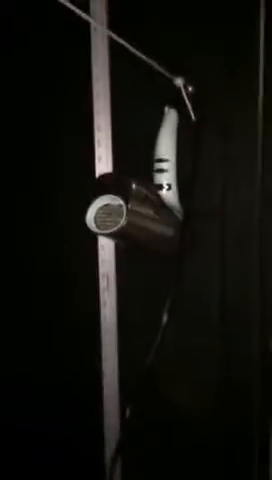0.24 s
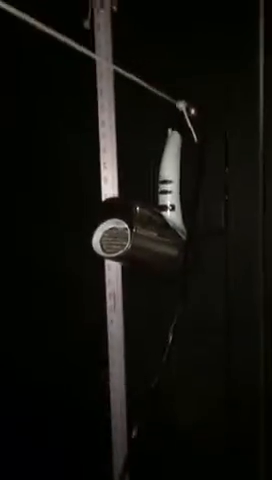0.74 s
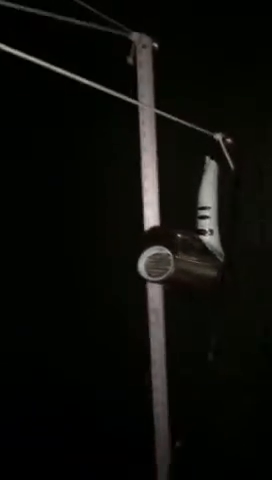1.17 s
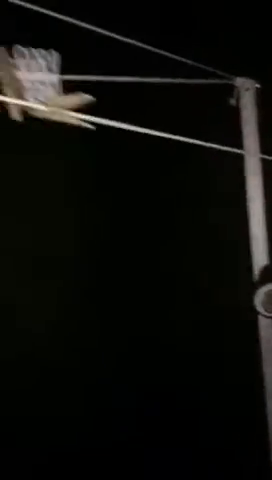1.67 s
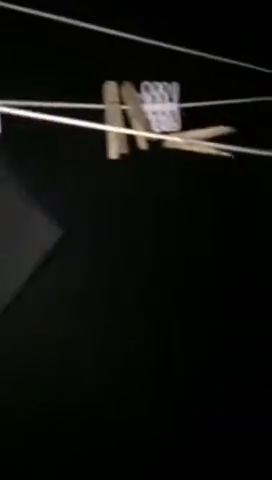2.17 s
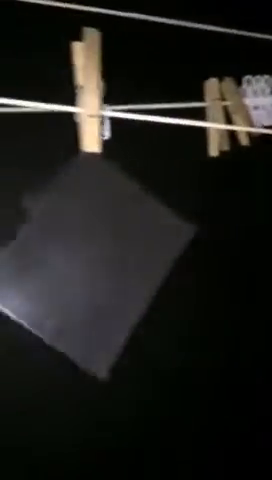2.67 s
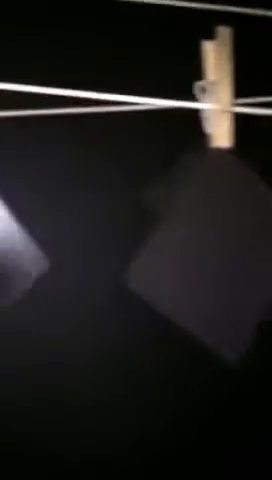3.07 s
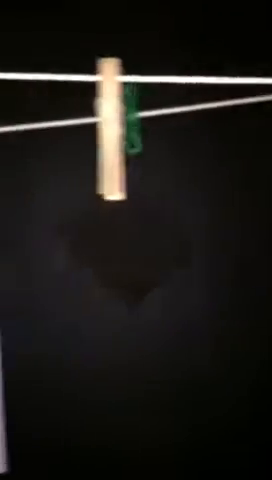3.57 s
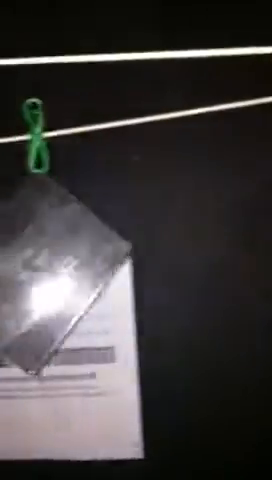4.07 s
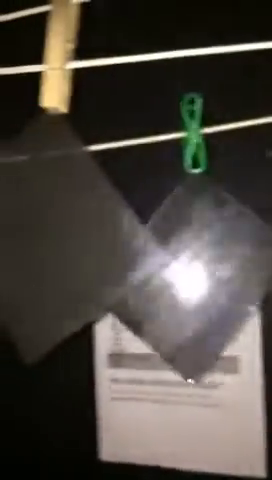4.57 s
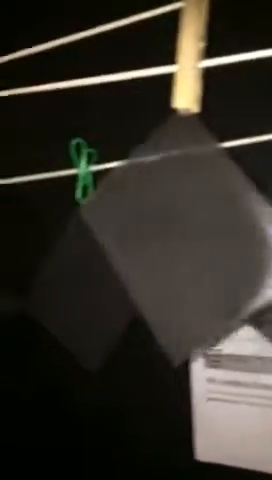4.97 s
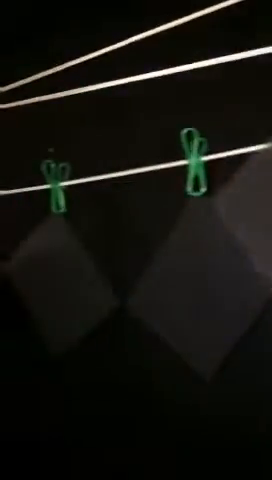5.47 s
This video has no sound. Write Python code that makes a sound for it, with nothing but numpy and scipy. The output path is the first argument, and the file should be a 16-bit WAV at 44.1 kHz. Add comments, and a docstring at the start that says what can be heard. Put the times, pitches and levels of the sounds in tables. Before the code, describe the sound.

A hair dryer hanging from a line blows without pause in a small room. Its broad, breathy rush carries a hollow howl that throbs unevenly several times a second, with a thin steady fan whine above it. A handheld microphone drifts slowly away, so the tone colour slides subtly while the loudness stays nearly level. The dryer neither starts nor stops.

```python
"""A rush of air with a throbbing howl and a thin whine: a hair dryer hangs from a line and runs steadily in a
small room, while the microphone moves slowly away. The rush is shaped noise; the howl is noise ringing barrel,
grille and room; a seven-blade fan adds sine tones locked to its shaft. Narrow bands of noise make faint drones
and ridges that stand out of the rush for a moment, most sliding slowly in pitch. Sliding echoes and moving
bands shift the colour of the rush as the microphone moves."""
import sys
import numpy as np
from scipy import signal
from scipy.fft import rfft, irfft
from scipy.io import wavfile
from scipy.ndimage import uniform_filter1d, map_coordinates

SR = 44100
rng = np.random.default_rng(int(sys.argv[2]) if len(sys.argv) > 2 else 0)


def unload_audio(sound):
    """Save the sound as a 16-bit wav file, at the path given as the first command line argument."""
    columns = np.transpose(np.atleast_2d(sound))
    # keep every value between -1 and 1, then stretch to whole-number steps
    steps = np.round(np.clip(columns, -1, 1) * 32767)
    wavfile.write(sys.argv[1], SR, steps.astype(np.int16))


N = 253125
TIME = np.arange(N) / SR
HZ = np.fft.rfftfreq(N, 1 / SR)


def gain_of(db):
    """Level definition: converts decibels to an amplitude ratio."""
    return 10 ** (np.asarray(db) / 20)


def evened(x):
    """Root-mean-square normalisation: scales to rms 1."""
    return x / np.sqrt(np.mean(x ** 2) + 1e-20)


def read(points, hz):
    """Spectral interpolation: reads a level curve along a logarithmic frequency axis."""
    f, value = np.transpose(points)
    return np.interp(np.log(hz + 1), np.log(f + 1), value)


def follow(rows, t):
    """Linear interpolation: reads every column of a curve table at the times t."""
    s, *columns = np.transpose(rows)
    return [np.interp(t, s, column) for column in columns]


def swell(centre_s, spread_s):
    """Gaussian envelope: a smooth rise and fall of height 1, with its standard deviation in seconds."""
    return np.exp(-.5 * ((TIME - centre_s) / spread_s) ** 2)


def bell(centre_hz, width_hz):
    """Lorentzian resonance curve: height 1, and half of that at the edges of its width."""
    return 1 / (1 + (2 * (HZ - centre_hz) / width_hz) ** 2)


def noise(gain):
    """Spectral shaping: random noise of rms 1 with the given amplitude spectrum."""
    return evened(irfft(gain * rfft(rng.standard_normal(N)), N))


def wander(rate_hz):
    """Low-pass random process: slow chance of rms 1, up to about the given rate."""
    return noise((HZ > 0) / (1 + (HZ / rate_hz) ** 4))


def steadied(x, span_s=0.13):
    """Power levelling: evens out a resonance's slow swells and keeps its quick throbs."""
    power = uniform_filter1d(x ** 2, int(span_s * SR), mode="wrap")
    return x / np.sqrt(power + 1e-9)


def ringing(hz, width_hz):
    """Resonance under random excitation: noise sounds through one steep resonance."""
    return steadied(noise(bell(hz, width_hz)))


def delayed(x, delay_s):
    """Propagation delay: reads a steady sound through a changing travel time."""
    return map_coordinates(x, [(TIME - delay_s) * SR], order=3, mode="wrap")


def rush(flutter_db=0.53, flicker_db=1.5, hiss_flutter_db=0.47):
    """Broadband turbulence: resonances colour it, and its hiss near 3 kHz rises and falls more than its body."""
    # turbulent air: centre_hz, relative_db per Hz
    air_spectrum = [(30, -68), (95, -41.5), (140, -24), (300, -18), (430, -16), (570, -7.5), (700, 1.5),
                    (790, 0), (900, 0.5), (1450, -7.5), (2200, -11), (3200, -13.5), (5200, -15.5),
                    (8500, -18), (11500, -22), (13300, -27.5), (15200, -31)]
    # resonances of the housing, as lifts of the rush: centre_hz, width_hz, lift_db
    housing = [(782, 45, 4), (1287, 25, 3), (1446, 167, 5), (1697, 19, 6.5), (1892, 240, 6),
               (2540, 90, 2.5), (4070, 870, 3), (4690, 110, 2.5), (9170, 325, 1), (14750, 250, 5)]
    # low room modes, as lifts of the rush: centre_hz, width_hz, lift_db
    room_modes = [(170, 9, 2.5), (260, 14, 1), (364, 30, 4), (466, 30, 7.5)]
    # level changes as the microphone moves: time_s, housing_ring_db, grille_hiss_db
    facing = [(0, 1.5, 3.5), (.45, 0.5, -0.5), (1.1, -1, -0.1), (1.6, 0.5, -0.5), (2.3, -1.5, -1.1),
              (3, -1, -2), (3.9, 0, -1), (4.45, -3.5, -0.5), (4.85, -1, 1.7), (5.74, -0.5, 1)]
    # brief surges of the rush: centre_s, spread_s, lift_db
    surges = [(1.052, 0.025, 1)]
    base_db = -32.5
    body_share, treble_share, fizz_share = 0.32, 0.2, 0.68  # how far each range follows the hiss

    lift_db = sum(db * bell(hz, width) for hz, width, db in housing + room_modes)
    air = noise(gain_of(read(air_spectrum, HZ) + lift_db))
    hz, t, z = signal.stft(air, SR, nperseg=512, noverlap=384)
    ring_db, hiss_db = follow(facing, t)
    shimmer_db = hiss_flutter_db * np.interp(t, TIME, wander(23))  # the hiss flutters by itself
    surge_db = sum(db * swell(s, spread_s) for s, spread_s, db in surges)
    gust_db = np.interp(t, TIME, flutter_db * wander(21) + surge_db)  # the whole jet flutters
    flicker = np.interp(t, TIME, wander(22))  # the top fizz flickers

    ranges = [  # centre_hz, lift_db over time
        (300, 0 * t),
        (1100, body_share * hiss_db),
        (1950, ring_db),
        (3200, hiss_db + shimmer_db),
        (8000, treble_share * hiss_db + shimmer_db),
        (13000, fizz_share * hiss_db + flicker_db * flicker),
    ]
    centres, levels = zip(*ranges)
    field_db = np.array([read(list(zip(centres, row)), hz) for row in np.transpose(levels)]).T
    moving = z * gain_of(field_db + gust_db + eddies(z.shape))
    air = signal.istft(moving, SR, nperseg=512, noverlap=384)[1][:N]
    return gain_of(base_db) * air


def eddies(shape, patchy_db=1.05, band_size=9, frame_size=28):
    """Turbulent eddies: they lift and lower patches of the rush, some 800 Hz wide and 80 ms long (dB)."""
    patches = uniform_filter1d(rng.standard_normal(shape), int(band_size), axis=0)
    patches = uniform_filter1d(patches, int(frame_size), axis=1)
    return patchy_db * evened(patches)


def reflections(x, echo_db=-21.5, near_s=.004, far_s=.03, drift=0.000158, dull_hz=7000, count=10):
    """Comb filtering: echo paths lengthen or shorten as the microphone moves, so the comb slides slowly."""
    # close surfaces (a start after its end runs backward): start_s, end_s, first_delay_s, last_delay_s, echo_db
    surfaces = [(-4, 1, 0.0026, 0.00272, -21), (2.5, 3.15, 0.00155, 0.00154, -21),
                (3.5, 2, 0.0033, 0.0031, -22), (3, 6.4, 0.00203, 0.00204, -20.5),
                (2.5, 6.2, 0.00069, 0.00082, -27), (8, 6.53, 0.0004, 0.000126, -16)]

    dull = irfft(rfft(x) / np.sqrt(1 + (HZ / dull_hz) ** 2), N)  # surfaces scatter the treble
    out = x.copy()
    for place, direction in rng.random((count, 2)):  # walls
        slide_s = drift * np.cos(np.pi * direction) * (TIME - TIME.mean())  # drift in s per s
        out += gain_of(echo_db) * delayed(dull, near_s + place * (far_s - near_s) + slide_s)
    for start, end, first, last, db in surfaces:  # each close echo swells and fades in passing
        passed = np.clip((TIME - start) / (end - start), 0, 1)
        echo = delayed(dull, first + passed * (last - first))
        out += gain_of(db) * np.sin(np.pi * passed) * echo
    return evened(out) * np.std(x)


def passing(x):
    """Spatial interference: bands swell or sink and slide upward as the microphone crosses the sound field."""
    # moving bands, both spreads Gaussian, width_hz two deviations: centre_s, spread_s, centre_hz, width_hz, lift_db
    bands = [(0.3, 0.52, 760, 30, 6.5), (0.5, 0.4, 970, 41, 5), (0.5, 0.34, 1800, 100, 5.5),
             (1.5, 0.95, 830, 31, -6), (0.2, .25, 940, 25, -8), (0, 0.29, 7600, 350, 4.5),
             (-0.5, .22, 10700, 300, 3), (2.5, 0.25, 2300, 100, 3.5), (1, 0.58, 1250, 67, -4.5),
             (1.4, .2, 6050, 300, 2), (0.8, .8, 4300, 600, 1), (2, 0.76, 542, 34, 9.5),
             (2.5, 0.19, 2200, 130, -8), (3.4, .25, 2260, 200, -2), (2.5, 0.21, 1590, 90, -2),
             (1, .4, 11300, 900, 2), (3, .25, 4100, 250, 2.5), (3.5, .2, 9000, 300, 3),
             (1, .25, 11000, 300, 2), (4.6, .2, 9100, 400, 2), (3.1, .25, 4800, 900, -2.5),
             (4.5, .25, 5600, 1000, -2.5), (4.15, .3, 9900, 800, -2.5), (4.5, .25, 2520, 130, -4),
             (3.5, .25, 2530, 90, -2.5), (2.2, 0.35, 1060, 97, -3), (4.5, .6, 1400, 30, -5),
             (4.5, 0.46, 1400, 30, -6), (5, 0.64, 1300, 140, 3.5), (6.5, 0.58, 4000, 600, 1.5)]
    climb_per_s = 0.013  # share of each band's centre frequency

    hz, t, z = signal.stft(x, SR, nperseg=4096, noverlap=3072)
    lift_db = ripple(hz, z.shape)
    for s, spread_s, centre_hz, width_hz, db in bands:
        moving_hz = centre_hz * (1 + climb_per_s * (t - s))
        offset = (hz[:, None] - moving_hz) / width_hz
        lift_db += db * np.exp(-.5 * ((t - s) / spread_s) ** 2 - 2 * offset ** 2)
    return signal.istft(z * gain_of(lift_db), SR, nperseg=4096, noverlap=3072)[1][:N]


def ripple(hz, shape, band_size=4, frame_size=12):
    """Standing waves: they streak the middle of the rush, in strands some 40 Hz wide and .3 s long (dB)."""
    depth_db, centre_hz, width_hz = 1.5, 1600, 3500  # rms depth at the centre
    strands = uniform_filter1d(rng.standard_normal(shape), band_size, axis=0)
    strands = uniform_filter1d(strands, frame_size, axis=1)
    return depth_db * evened(strands) / (1 + (2 * (hz[:, None] - centre_hz) / width_hz) ** 2)


def howl():
    """Resonant excitation: turbulence rings the barrel, the grille and two room notes, which swell and fade."""
    # a low hum that comes and goes in the room: centre_s, spread_s, level_db
    hum_swells = [(.2, 0.21, -57), (0.604, 0.12, -56), (1.33, 0.13, -59), (1.648, 0.15, -57),
                  (2.74, 0.27, -55), (3.445, 0.087, -54.5), (3.9, 0.083, -51.5), (4.213, 0.2, -53),
                  (4.693, 0.066, -55), (5.037, 0.13, -54), (5.34, 0.074, -50.5)]
    # a higher room note that stands out late: time_s, level_db
    room_curve = [(0, -57.5), (3.5, -56.5), (3.9, -48), (4.9, -51.5), (5.4, -45.5), (5.74, -50.5)]

    hum_power = sum((gain_of(db) * swell(s, spread_s)) ** 2 for s, spread_s, db in hum_swells)
    hum = np.sqrt(hum_power) * ringing(hz=335.2, width_hz=8)
    room_note = gain_of(follow(room_curve, TIME)[0]) * ringing(hz=487.7, width_hz=32)
    ring_gain, _ = beamed()
    grille = ring_gain * ringing(hz=2390, width_hz=360)
    return throbbing() + hum + room_note + grille


def throbbing():
    """Beating: neighbouring barrel notes interfere, and the howl swells and dips several times a second."""
    # notes of the barrel: centre_hz, width_hz
    barrel = [(600, 18), (626, 33.4), (655, 36), (688, 49)]
    # barrel notes at the microphone, before throbs: time_s, first_db, second_db, third_db, fourth_db
    note_levels = [(0, -34, -38, -51, -35.5), (.62, -34, -31, -51, -43), (.9, -33.5, -41.5, -49, -38.5),
                   (1.2, -37, -32.5, -44, -42.5), (2.3, -38, -33.5, -37, -46.5),
                   (2.6, -35.5, -35.5, -41, -48), (2.88, -37.5, -30.5, -40, -46),
                   (3.2, -36.5, -37.5, -38, -40), (3.95, -40, -45.5, -33.5, -42),
                   (4.4, -43, -37.5, -39, -51), (5.1, -36.5, -43.5, -39, -57), (5.74, -44.5, -51, -40, -39)]
    # strongest swells and dips of the howl: centre_s, lift_db
    throbs = [(.11, -4), (.39, -4), (.587, 3), (.673, 3.5), (.95, -4), (1.091, 6.5), (1.161, 1),
              (1.293, 2.5), (1.365, -5), (1.43, -3), (1.55, -3), (1.736, 2), (1.904, 4), (2.0, -7),
              (2.043, 4.5), (2.133, 4), (2.216, 3.5), (2.26, -4), (2.467, 3.5), (2.55, -6), (2.74, -5),
              (2.854, 3), (2.913, 3), (3.15, -5), (3.24, -2), (3.467, 4.5), (3.645, 4.5), (3.68, -2),
              (3.893, 3), (3.949, 3.5), (4.32, -1), (4.42, -5), (4.54, -2), (4.635, 4), (4.724, 5.5),
              (4.96, -5), (5.083, 3.5), (5.17, -11), (5.244, 3.5)]
    throb_spread_s = .015
    beat_span_s, beat_evening = .05, .7  # beats slower than the span are evened by this share (0-1)

    gains = gain_of(follow(note_levels, TIME))
    level = np.linalg.norm(gains, axis=0)
    beats = sum(gain * ringing(*note) for note, gain in zip(barrel, gains)) / level
    size = int(beat_span_s * SR)
    power = uniform_filter1d(uniform_filter1d(beats ** 2, size), size // 2)
    throb_db = sum(db * swell(s, throb_spread_s) for s, db in throbs)
    return level * gain_of(throb_db) * beats / (power + 1e-9) ** (beat_evening / 2)


def beamed():
    """Directivity: the grille's ring and the upper fan tone leave in the same narrow beams (two gains)."""
    # beams that sweep over the microphone: centre_s, spread_s, grille_ring_db, upper_tone_db
    beams = [(0, 0.13, -52, -46.5), (.46, .07, -60, -48), (1.42, 0.2, -48, -46), (3.4, 0.21, -62, -46),
             (3.9, 0.3, -62, -49), (4.68, 0.42, -60, -50), (5.5, 0.13, -62, -51)]
    ring, tone = gain_of(-57), gain_of(-62.5)  # levels off the beams
    for s, spread_s, ring_db, tone_db in beams:
        ring = np.hypot(ring, gain_of(ring_db) * swell(s, spread_s))
        tone = np.hypot(tone, gain_of(tone_db) * swell(s, spread_s))
    return ring, tone


def whine():
    """Blade passing: fan tones and weak motor orders are multiples of one slightly unsteady shaft speed."""
    # motor speed before jitter: time_s, turns_per_s
    shaft = [(0, 169.8), (1.5, 168.6), (3.2, 169.3), (4.1, 169.6), (5.74, 169.3)]
    # weak motor tones: multiple of the shaft speed, level_db before waver
    motor_orders = [(1, -74.5), (10, -61), (21, -61.5)]
    # standing wave of the blade tone: crest_db, drift_db_per_s, crest_s, period_s, depth_db
    blade_wave = (-46.5, -1.0, 1.4, 3.6, 16)
    blades = 7
    jitter, waver_db, upper_waver_db = .0004, 3.5, 1.5  # rms: share of the speed, tone levels in dB

    speed = follow(shaft, TIME)[0] * (1 + jitter * wander(11.5))
    angle = 2 * np.pi * np.cumsum(speed) / SR
    _, upper_gain = beamed()
    tones = [(blades, standing(*blade_wave), waver_db), (2 * blades, upper_gain, upper_waver_db)]
    tones += [(order, gain_of(db), waver_db) for order, db in motor_orders]
    out = np.zeros(N)
    for order, gain, depth_db in tones:
        out += gain * gain_of(depth_db * wander(10.5)) * np.sin(round(order) * angle)
    return np.sqrt(2) * out  # levels are rms


def standing(crest_db, drift_db_per_s, crest_s, period_s, depth_db):
    """Standing wave: gain of one note while the microphone passes crests and nodes at an even pace."""
    node = gain_of(-depth_db)
    turn = np.pi * (TIME - crest_s) / period_s
    return gain_of(crest_db + drift_db_per_s * TIME) * np.hypot(np.cos(turn), node * np.sin(turn))


def drones():
    """Room modes: faint low notes of the room grow as the microphone leaves the dryer."""
    # low room notes: centre_hz, width_hz, first_db, last_db
    low_notes = [(118.3, 5, -82, -74.5), (142, 6, -71.5, -71), (209.4, 10, -68, -65.5)]
    out = np.zeros(N)
    for hz, width, first_db, last_db in low_notes:
        out += gain_of(np.linspace(first_db, last_db, N)) * ringing(hz, width)
    return out


def ridges():
    """Gliding band-pass noise: narrow bands of the rush stand out for a moment, most sliding slowly in pitch."""
    # ridges, with pitch at their centre: centre_s, spread_s, pitch_hz, glide_hz_per_s, level_db
    ridge_rows = [(1.5, 0.43, 788, 15.5, -41), (4.32, 0.16, 812, -3, -40.5), (1.85, .35, 942, 0.5, -47),
                  (4.65, .35, 968, 21.5, -42.5), (.68, .17, 1120, 0, -47), (4.3, 0.17, 1086, 15, -41),
                  (1.6, 0.28, 1186, 30.5, -41), (2.45, 0.43, 1218, 25.5, -44), (2.3, .6, 1418, 7.5, -50),
                  (3.8, .1, 1462, 0, -45), (0.98, 0.28, 1400, 21, -49), (0.42, 0.22, 1882, 1, -45.5),
                  (2.7, 0.28, 1858, -45, -47), (3.7, .25, 1942, 27, -48.5), (3.06, .15, 1800, 3, -48),
                  (1.33, 0.18, 2528, -37, -49.5), (2.23, 0.22, 2560, 0, -52)]
    out = np.zeros(N)
    for s, spread_s, hz, glide, db in ridge_rows:
        slide = np.exp(1j * np.pi * glide * (TIME - s) ** 2)
        band = (signal.hilbert(ringing(hz, width_hz=22)) * slide).real
        out += gain_of(db) * swell(s, spread_s) * band
    return out


def scene():
    """Superposition: the dryer's sounds in the room add at one microphone, heard on both channels."""
    mono = passing(reflections(rush())) + howl() + ridges() + whine() + drones()
    return np.array([mono, mono])


def record(dry):
    """Band limiting: a steep low-pass filter sets the recorder's upper edge."""
    edge_hz = 15350
    low_pass = signal.firwin(1023, edge_hz, window=("kaiser", 9), fs=SR)
    return signal.oaconvolve(dry, low_pass[None], "same")


dry = scene()
out = record(dry)
unload_audio(out)
```